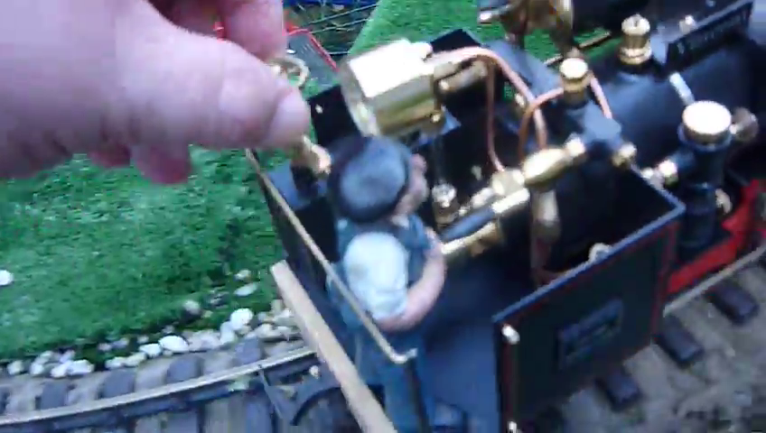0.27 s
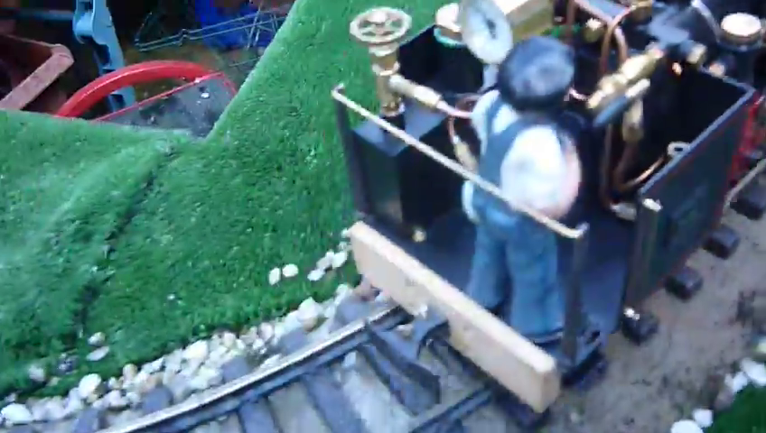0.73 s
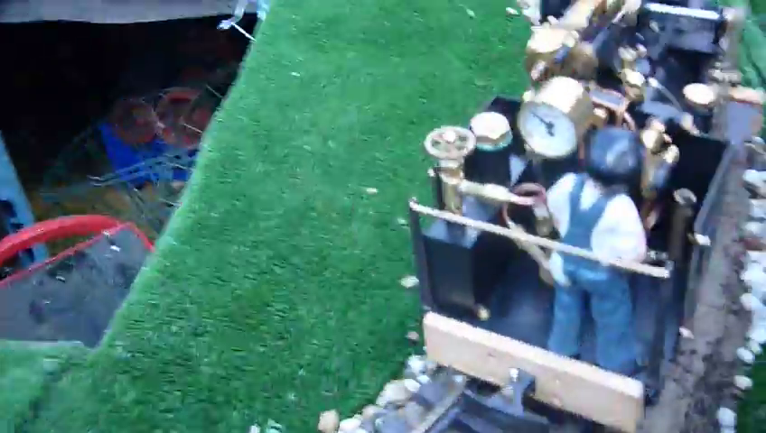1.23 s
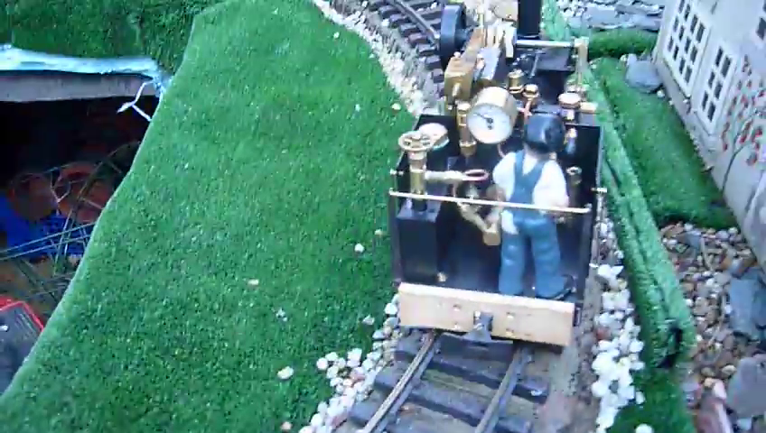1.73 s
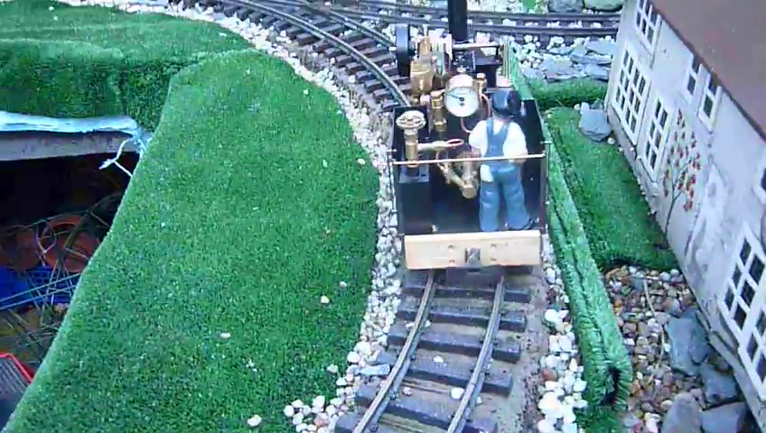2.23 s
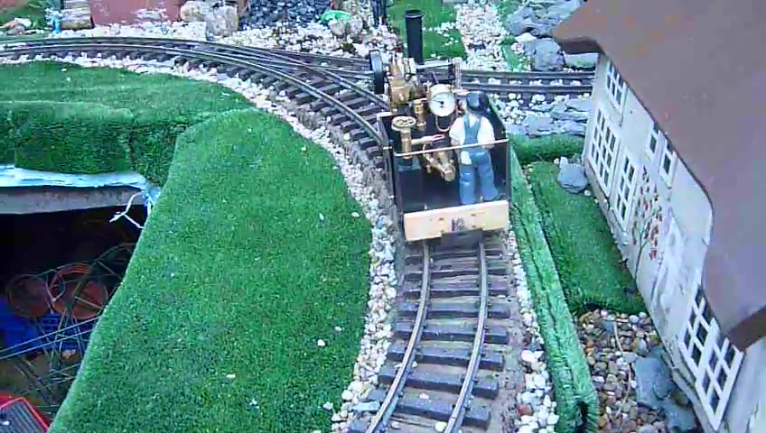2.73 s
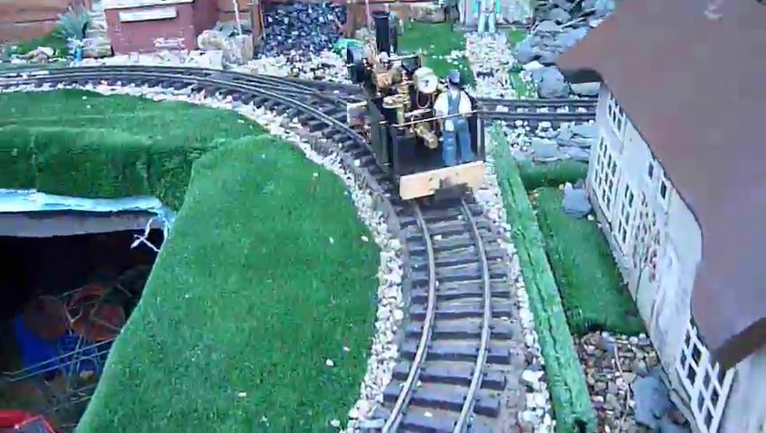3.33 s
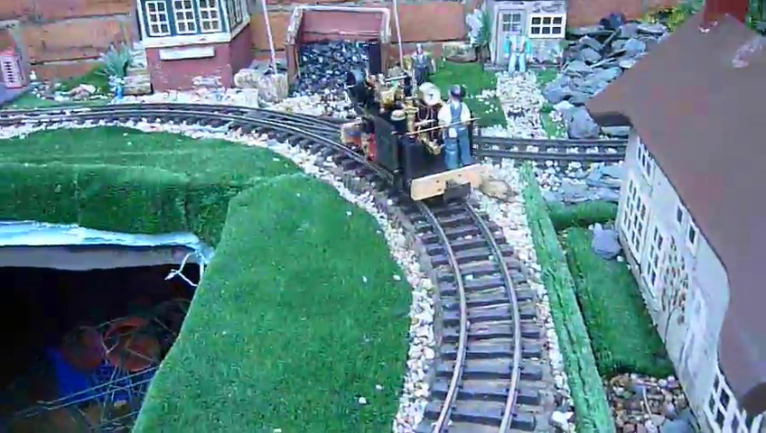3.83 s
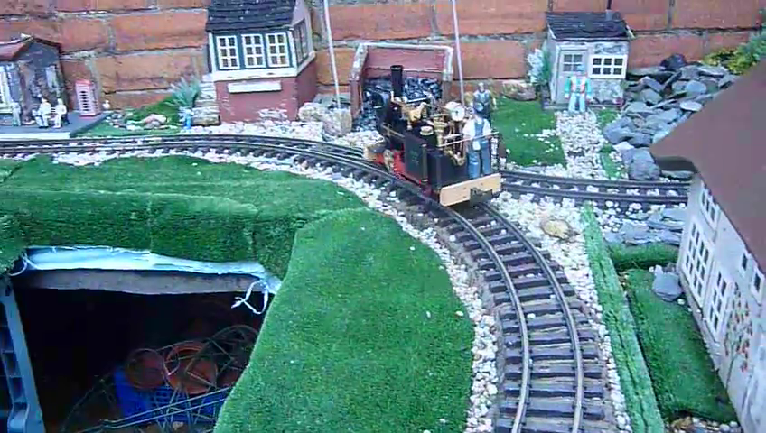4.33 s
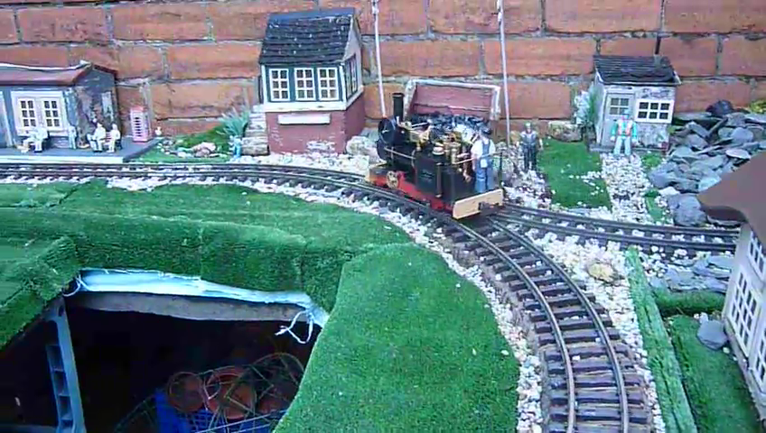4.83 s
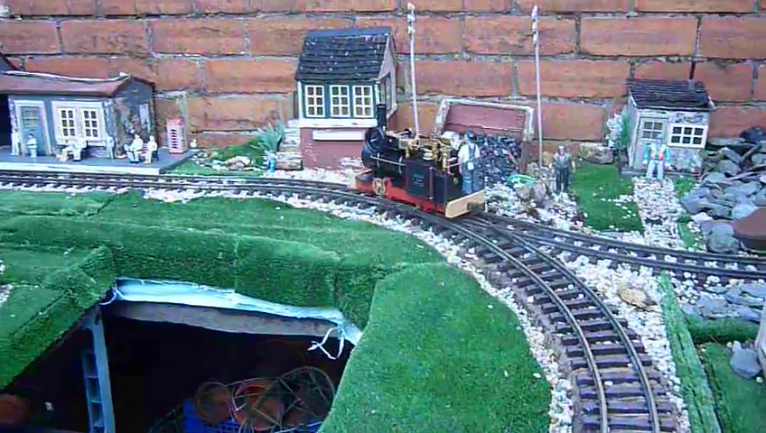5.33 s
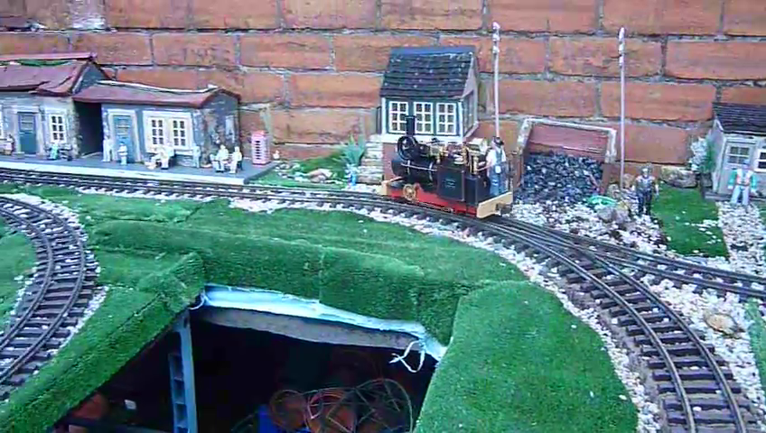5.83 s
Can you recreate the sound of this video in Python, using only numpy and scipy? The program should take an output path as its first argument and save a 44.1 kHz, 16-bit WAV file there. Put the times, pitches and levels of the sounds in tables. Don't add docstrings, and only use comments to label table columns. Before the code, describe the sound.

A small gas-fired model steam locomotive runs outdoors, starting less than half a metre from the microphone. From 0 seconds its exhaust is loud and close: about thirty puffs a second, merging into a rough, fluttering hiss with bright fizz, a thin metallic ring and hollow little thuds, strong and weak ones alternating. Beneath is a steady burner rush with a low, wavering drone. From about 0.8 seconds it pulls away and the sound softens, its pace nearly constant, its tone shifting slightly around the curve. Wind pops bump the microphone from about 1.2 seconds, heavier near 1.8 and 2.15, then in a flurry from 3.3 to 3.7. By 4 seconds the engine is about two metres off, fainter, the drone mostly gone, with short reflections from brick and buildings. One strong low wind thump comes at 5.0, a lighter one near 5.9, and the puffing hiss continues to the end at about 6.

```python
import sys
import numpy as np
from scipy import signal
from scipy.fft import rfft, irfft, next_fast_len
from scipy.io import wavfile
from scipy.ndimage import map_coordinates

SR = 44100
rng = np.random.default_rng(int(sys.argv[2]) if len(sys.argv) > 2 else 0)


def boost(x):
    u = np.asarray(x, float) / 20
    return 10 ** u


def pcm_store(signal):
    levels = np.round(np.clip(np.atleast_2d(signal), -1, 1) * 32767)
    wavfile.write(sys.argv[1], SR, levels.astype(np.int16).T)


N = 267687
TIME = np.arange(N) / SR

# time in seconds, exhaust beats so far.
BEATS = [(0, 0.22), (0.15, 4.66), (0.27, 8.13), (0.42, 12.7), (0.99, 30.62), (1.35, 41.39), (1.83, 56.09),
         (2.19, 67.4), (2.67, 82.62), (3.15, 97.74), (3.51, 108.73), (3.99, 123.04), (4.11, 126.75),
         (4.83, 149.56), (5.07, 156.83), (5.43, 168.08), (5.67, 175.84), (6.08, 189.73)]
# lateness in beats, blast level in dB, thud level in dB.
VALVES = [
    (0.017, -6, -6.5),
    (0.048, -6, -12),
    (0.0061, -6, -6.5),
    (0.057, -5.5, -15),
]
# time in seconds, distance in metres,
# how far the chimney mouth faces the microphone (about -1 to 1), chimney note in Hz.
PATH = [(0, 0.48, -.8, 2970), (.4, 0.48, -0.34, 2974), (.8, .55, -1.16, 2870), (1.2, 0.68, 0.58, 2767),
        (1.45, 0.87, 0.017, 2870), (1.8, 0.84, -0.3, 2830), (2.35, 1.18, 0.94, 2896),
        (2.65, 1.45, -0.038, 2880), (2.95, 1.55, 0.55, 2883), (3.3, 1.88, -0.83, 2890),
        (3.6, 1.7, -0.18, 2830), (3.95, 2.14, -0.42, 2815), (4.55, 2.0, 0.095, 2837),
        (4.85, 2.2, -0.42, 2840), (5.2, 2.25, .5, 2853), (5.5, 2.48, -0.45, 2804), (6.07, 2.3, 0.87, 2817)]
# time in seconds, blast pipe in Hz,
# its upper note in Hz, high smokebox note in Hz.
TURNING = [(0, 4680, 5760, 913), (.4, 4970, 5840, 937), (.65, 5230, 5640, 937), (1.75, 5420, 5700, 908),
           (2.05, 4940, 5700, 943), (3.2, 4910, 5610, 1000), (3.8, 4880, 5620, 953),
           (4.35, 4990, 5800, 996), (4.65, 4680, 5400, 948), (5.3, 5150, 5550, 962),
           (6.07, 5300, 5820, 924)]


def evened(x):
    return x / np.sqrt(np.mean(x ** 2) + 1e-20)


def curves(rows):
    seconds, *columns = np.transpose(rows)
    return [np.interp(TIME, seconds, column) for column in columns]


def coloured(x, points):
    size = next_fast_len(N)
    hz, db = np.transpose(points)
    log_hz = np.log(np.fft.rfftfreq(size, 1 / SR) + 1)
    gain = boost(np.interp(log_hz, np.log(hz), db))
    return evened(irfft(rfft(x, size) * gain, size)[:N])


def resonate(x, hz, width_hz):
    turn = np.exp(2j * np.pi * np.cumsum(hz * np.ones(N)) / SR)
    r = np.exp(-np.pi * width_hz / SR)
    smooth = signal.lfilter([1 - r], [1, -r], x / turn)
    return evened((turn * smooth).real)


def flutter(hz):
    return evened(signal.lfilter(*signal.butter(2, hz, fs=SR), rng.standard_normal(N)))


def exhaust():
    # frequency in Hz, level in dB.
    fizz_colour = [(5500, -29), (6500, -12.5), (7300, -0.5), (8000, 0.2), (8500, -11), (9200, -13.5)]
    beats = curves(BEATS)[0] + 0.324
    jet_db, ring_db, thud_db, fizz_db = balance()
    blast = valve_flow(beats, column=1, rise=0.12, fall_db=37, spread_db=1.08)
    steam = blast * boost(0.5 * flutter(180)) * rng.standard_normal(N)
    jet = boost(0.47) * steam_jet(steam)
    fizz = boost(fizz_db) * coloured(steam * boost(2.9 * flutter(150)), fizz_colour)
    ring = boost(ring_db) * chimney_ring(beats)
    thud = boost(thud_db) * smokebox_thud(beats)
    return boost(jet_db) * (jet + fizz + ring + thud)


def balance():
    metres, facing, _ = curves(PATH)
    doublings = np.log2(metres)

    def layer(db, facing_db, far_db):
        wander_db = 0.85 * flutter(3.8)
        return db + facing_db * facing + far_db * doublings + wander_db

    jet_db = -40.5 - 20 * np.log10(metres)
    ring_db = layer(0.57, 3.5, 0.5)
    thud_db = layer(-8.0, 0.1, 0.8)
    fizz_db = layer(-7.94, -2, 1.8)
    return jet_db, ring_db, thud_db, fizz_db


def valve_flow(beats, column, rise, fall_db, spread_db):
    late = np.transpose(VALVES)[0]
    level_db = np.transpose(VALVES)[column]
    chance = rng.standard_normal((200, 2)).clip(-1.5, 1.5)
    flow = np.zeros(N)
    for back in (0, 1):
        k = np.floor(beats).astype(int) - back + 4
        since = beats + 4 - k - late[k % 4] - 0.026 * abs(chance[k, 0])
        emptying = np.abs(since) ** 2.3
        db = level_db[k % 4] + spread_db * chance[k, 1] - fall_db * emptying
        flow += np.clip(since / rise, 0, 1) * boost(db)
    return evened(flow)


def steam_jet(steam):
    # frequency in Hz, level in dB.
    jet_colour = [(300, -35), (900, -13), (1500, 0.5), (2050, -7.5), (2500, 1), (3500, 1), (4200, 1),
                  (5000, 1.5), (5800, 1.5), (6400, -9.5), (7000, -13.5), (8400, -36)]
    metres = curves(PATH)[0]
    blast_hz, upper_hz, _ = curves(TURNING)
    upper_db = -19 + 8 * (upper_hz - blast_hz) / 1000
    cab_hz, cab_db = 3380 + 487 * metres, -31 + 9 * metres
    jet = coloured(steam, jet_colour)
    for hz, db in [(blast_hz, -9), (upper_hz, upper_db), (cab_hz, cab_db)]:
        jet += boost(db) * resonate(steam, hz, 180)
    return evened(jet)


def chimney_ring(beats):
    chimney_hz = curves(PATH)[2]
    draught = valve_flow(beats, column=1, rise=0.023, fall_db=25, spread_db=1.03) * rng.standard_normal(N)
    return resonate(resonate(draught, chimney_hz, 170), chimney_hz, 380)


def smokebox_thud(beats):
    # time in seconds, pitch in Hz.
    low_note = [(0, 712), (.9, 694), (1.3, 604), (2.3, 537), (3.2, 506), (4.3, 617), (5.3, 550),
                (6.07, 566)]
    low_hz, high_hz = curves(low_note)[0], curves(TURNING)[2]
    rush = valve_flow(beats - 0.12, column=2, rise=0.079, fall_db=60.5, spread_db=5.5) * rng.standard_normal(N)
    push = 0.43 * rush + 0.79 * knocks()
    low = boost(1.6) * resonate(resonate(push, low_hz, 100), low_hz, 300)
    top = boost(-8.5) * resonate(resonate(push, 1.255 * high_hz, 130), 1.24 * high_hz, 300)
    high = boost(0.7) * resonate(resonate(push, high_hz, 99), high_hz, 290)
    return evened(low + top - high)


def knocks():
    k = np.floor(curves(BEATS)[0] + 0.0597).astype(int)
    strength_db = np.transpose(VALVES)[2][k % 4] + 0.84 * rng.standard_normal(256)[k]
    return evened(np.diff(k, prepend=k[0]) * boost(strength_db))


def burner():
    metres = curves(PATH)[0]
    loss_db = 20 * np.log10(metres)
    drone_db = -46 - loss_db - 7 * (metres - 1)
    roar_db = -43.5 - 0.63 * loss_db + 1.3 * flutter(16.7)
    return boost(drone_db) * flue_drone() + boost(roar_db) * flame_roar()


def flue_drone():
    flue_hz, width_hz = 206, 45
    phase = 2 * np.pi * np.cumsum(flue_hz + 9 * flutter(20)) / SR
    note = np.sqrt(2) * np.sin(phase) * boost(1.7 * flutter(18))
    push = 0.72 * rng.standard_normal(N) + 0.78 * knocks()
    rung = resonate(resonate(push, flue_hz + 4 * flutter(6.4), width_hz), flue_hz, 140)
    return evened(1.2 * note + rung)


def flame_roar():
    # frequency in Hz, level in dB.
    roar_colour = [(53, -29), (90, 9.5), (589, 3), (814, -1), (895, 2), (2020, -8), (2790, -3.5),
                   (3580, -7.5), (5640, -9), (7790, -18), (8400, -49.5), (10900, -54.5), (18500, -120)]
    flame = rng.standard_normal(N)
    roar = coloured(flame, roar_colour) + boost(-19.5) * resonate(flame, curves(TURNING)[2], 110)
    no_bass = signal.butter(3, 125, "high", fs=SR, output="sos")
    return signal.sosfilt(no_bass, roar)


def mirrored(x):
    # first lag in ms, change of lag in ms per second, share of the sound,
    # time of closest pass in seconds, time in view in seconds.
    buildings = [
        (2.1, -.12, 0.27, 1.4, .5),
        (2.6, -.13, 0.23, 2.5, 0.49),
        (2.6, -.14, .35, 4.67, .6),
        (3.6, -.13, 0.18, 5.6, 0.98),
    ]
    metres = curves(PATH)[0]
    chimney_m, mic_m = 0.233, 0.416
    detour_m = np.hypot(metres, mic_m + chimney_m) - np.hypot(metres, mic_m - chimney_m)
    paths = [(detour_m / 0.343, 0.043)]
    for ms, drift, share, closest, seen in buildings:
        paths.append((ms + drift * TIME, share * np.exp(-((TIME - closest) / seen) ** 2)))
    late = 0
    for ms, share in paths:
        late = late + share * map_coordinates(x, [np.arange(N) - ms * SR / 1000], order=3)
    return (x + late) / np.sqrt(1 + sum(share ** 2 for _, share in paths))


def walls(x):
    at = np.arange(60, 12000, 20) + rng.integers(0, 20, 597)
    taps = np.zeros(12020)
    taps[at] = rng.choice([-1., 1.], len(at)) * boost(-60 * at / SR / 0.11)
    return signal.oaconvolve(x, taps / np.linalg.norm(taps))[:N]


def wind():
    # frequency in Hz, level in dB.
    gust_colour = [(20, -35), (45, -12), (80, -3.5), (125, 1), (200, -10), (320, -9), (600, -40.5)]
    # middle in seconds, half length in seconds, level in dB.
    gust_times = [(.91, .12, -59), (1.6, 0.22, -59), (1.74, 0.11, -47), (2.1, 0.24, -52),
                  (2.582, 0.19, -47.5), (3.497, .2, -49), (3.635, 0.036, -42), (3.343, .03, -46),
                  (3.8, .07, -47), (4.185, 0.13, -51), (5.09, .08, -65), (3.05, 0.1, -57.5),
                  (4.6, 0.43, -66)]
    # time in seconds, peak level in dB, pitch in Hz, length in cycles.
    pops = [(1.2203, -22, 150, 1.3), (1.6675, -23, 195, 0.76), (1.6601, -26, 190, 0.97),
            (1.7873, -14.5, 210, 0.46), (1.796, -19, 187, .9), (1.8923, -19.5, 160, 0.92),
            (2.144, -22, 200, 0.88), (2.1496, -15.5, 250, 0.95), (2.1641, -10.5, 201, 0.73),
            (2.1761, -19, 154, 0.59), (2.481, -21.6, 178, 0.72), (2.5725, -25.5, 143, 1.25),
            (2.693, -25, 204, 0.6), (2.7039, -19, 253, 1.8), (3.344, -23, 160, 0.57),
            (3.3572, -19, 179, .81), (3.3995, -17.5, 180, 0.84), (3.5631, -23.9, 180, 1.05),
            (3.5773, -21.5, 150, 1.2), (3.5846, -17, 200, 0.98), (3.591, -21, 197, .9),
            (3.5985, -23.2, 166, 1.2), (3.6246, -24.5, 223, 1.3), (3.6408, -25, 190, .86),
            (3.6613, -10.5, 223, 0.74), (3.6714, -21, 242, 0.41), (5.0022, -9.5, 147.3, 1.15),
            (5.0116, -18.5, 128, .53), (5.9078, -23, 146, 1.05), (6.0477, -31, 117, 0.69)]
    # time in seconds, peak level in dB, pitch in Hz.
    soft_pops = [(.5347, -38, 147), (0.9223, -34, 198), (.967, -29, 107), (1.1705, -31, 247),
                 (1.204, -33, 133), (1.2413, -32.5, 117), (1.6295, -31, 373), (1.8255, -30, 276),
                 (1.8857, -28, 191), (2.009, -30, 150), (2.088, -33, 127), (2.124, -28, 142),
                 (2.156, -27, 95), (2.1924, -30, 107), (2.3125, -27, 160), (2.516, -36, 110),
                 (2.6583, -25.5, 170), (2.705, -27.5, 85), (2.7803, -26, 187), (2.8375, -33.5, 99),
                 (3.328, -24.5, 162), (3.4698, -28, 163), (3.682, -28, 180), (3.81, -28.4, 178),
                 (3.961, -30.5, 107), (4.1946, -32, 98), (4.391, -36, 91), (4.43, -32, 93.5),
                 (4.5836, -30, 128), (5.1328, -34.5, 106)]
    strength = boost(-67.5)
    for s, half, db in gust_times:
        strength = strength + boost(db) * np.exp(-((TIME - s) / half) ** 2)
    lumps = boost(4.5 + 3.0 * flutter(40))
    air = strength * lumps * coloured(rng.standard_normal(N), gust_colour)
    for s, db, hz, cycles in list(pops) + [(*row, 1) for row in soft_pops]:
        near = slice(round(s * SR) - 900, round(s * SR) + 900)
        u = (TIME[near] - s) * hz
        swing = np.sin(2 * np.pi * u) * np.exp(-np.where(u < 0, 3.6, 2.2) * (u / cycles) ** 2)
        edge = np.sin(2 * np.pi * 2.57 * u) * np.exp(-5.5 * (u + 0.23) ** 2)
        edge_db = -12 - 12.5 * np.log2(hz / 150)
        air[near] += boost(db) * (boost(edge_db) * edge - swing)
    return air


def scene():
    engine = mirrored(exhaust()) + burner()
    echo_db = -14.0 + 1.08 * TIME
    return (engine + boost(echo_db) * walls(engine) + wind())[None]


def roll_off(x):
    return signal.sosfilt(signal.butter(12, 9480, fs=SR, output="sos"), x)


def record(dry):
    band_limit = signal.firwin(151, 8510, window=("kaiser", 9), fs=SR)
    narrow = signal.oaconvolve(dry, band_limit[None], "same")
    return roll_off(narrow - 0.0561)


dry = scene()
out = record(dry)
pcm_store(out)
```